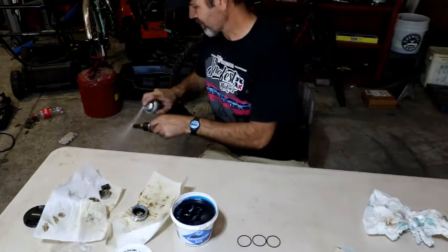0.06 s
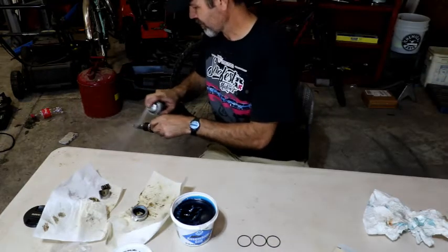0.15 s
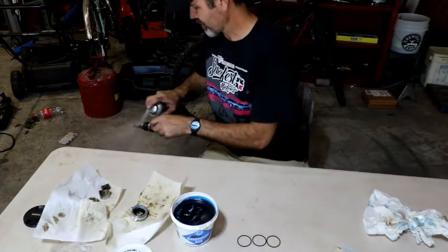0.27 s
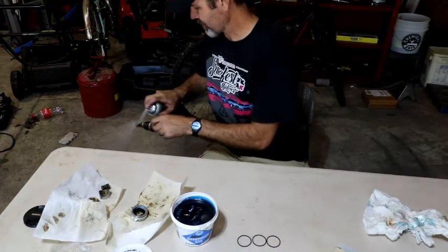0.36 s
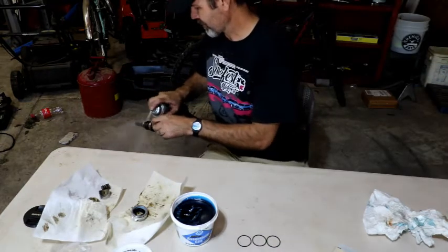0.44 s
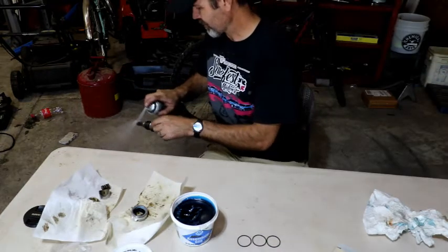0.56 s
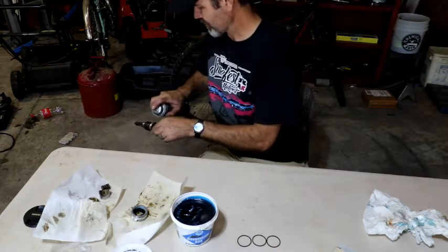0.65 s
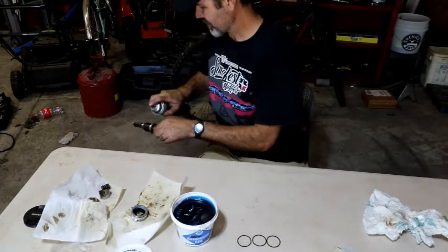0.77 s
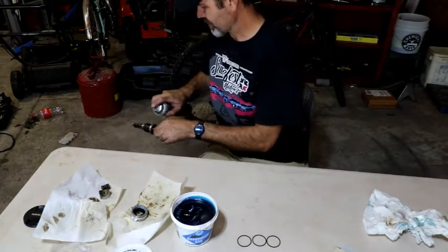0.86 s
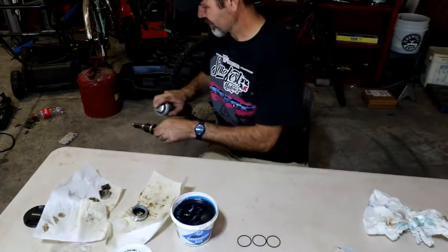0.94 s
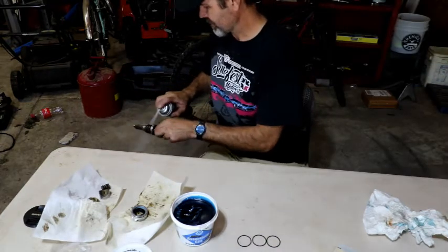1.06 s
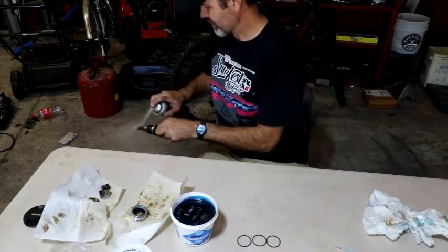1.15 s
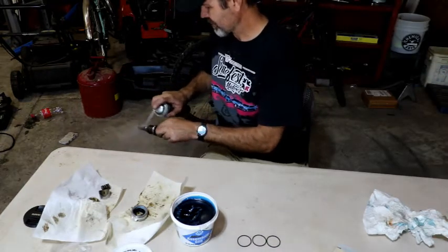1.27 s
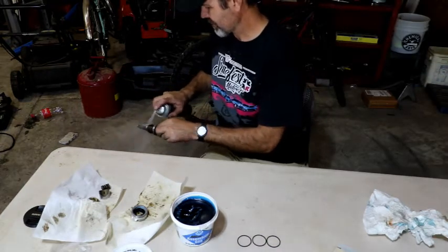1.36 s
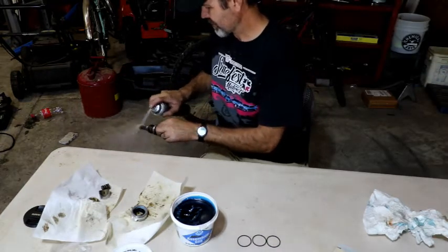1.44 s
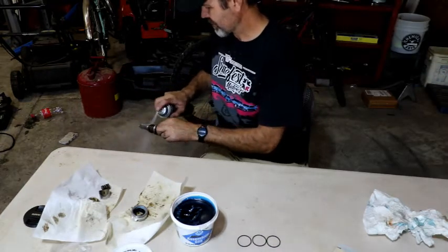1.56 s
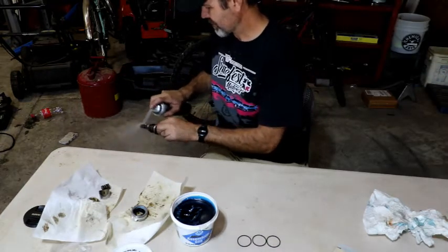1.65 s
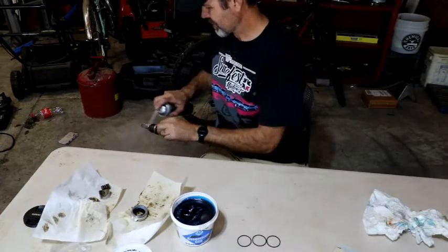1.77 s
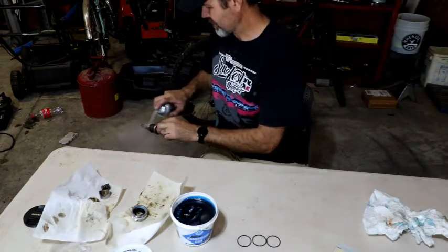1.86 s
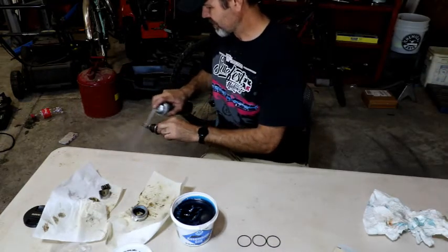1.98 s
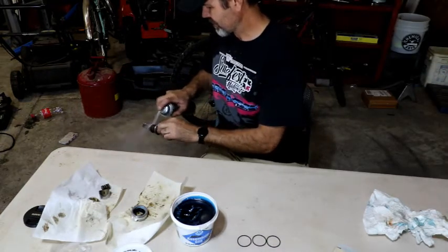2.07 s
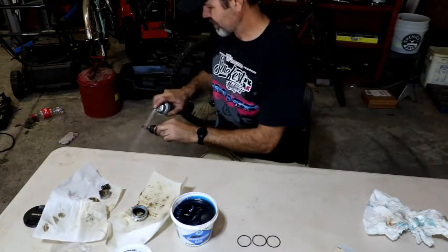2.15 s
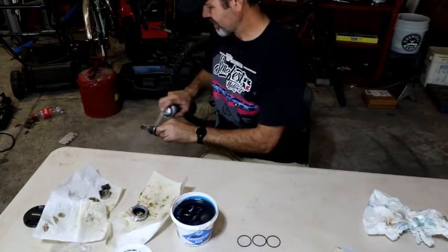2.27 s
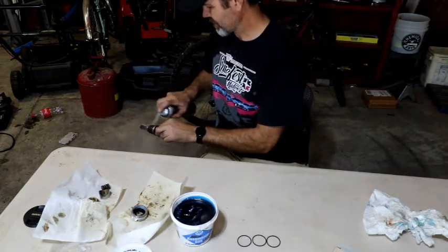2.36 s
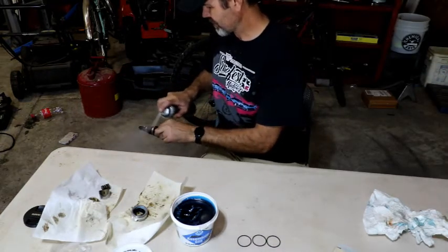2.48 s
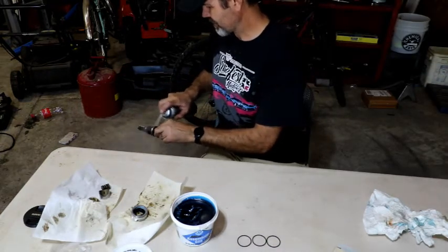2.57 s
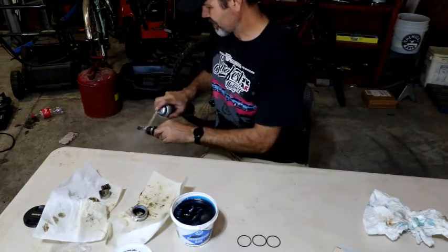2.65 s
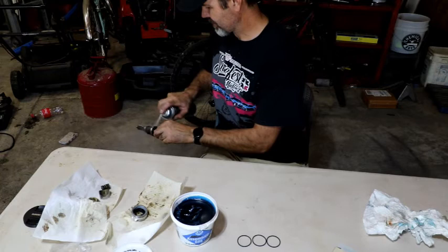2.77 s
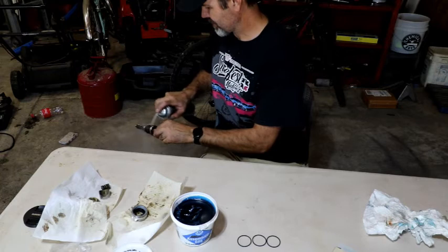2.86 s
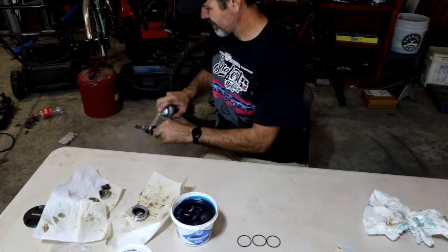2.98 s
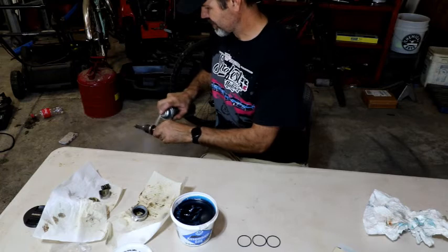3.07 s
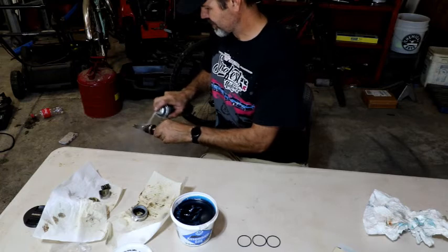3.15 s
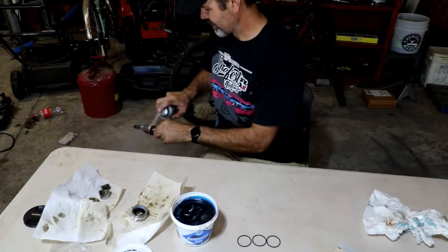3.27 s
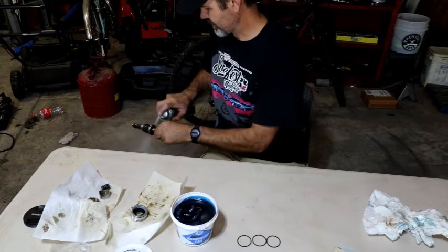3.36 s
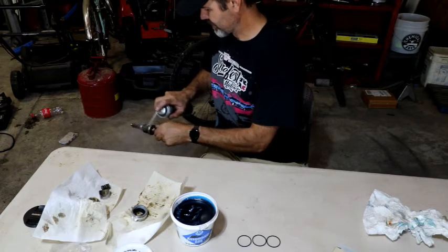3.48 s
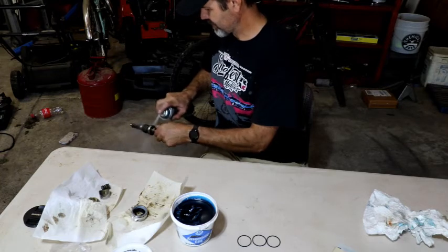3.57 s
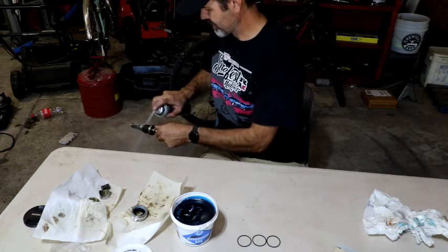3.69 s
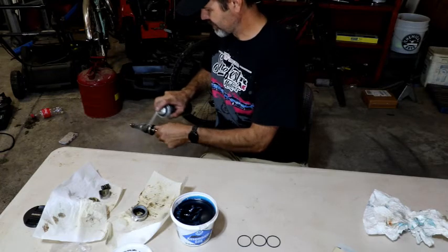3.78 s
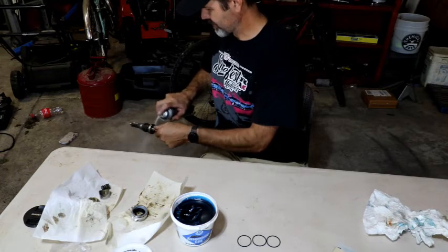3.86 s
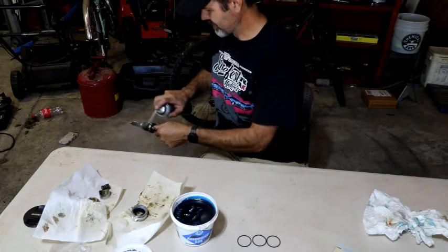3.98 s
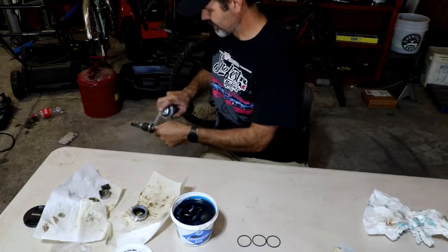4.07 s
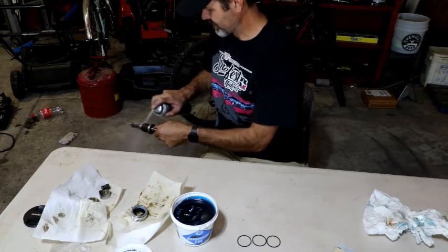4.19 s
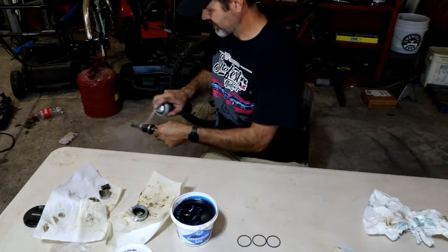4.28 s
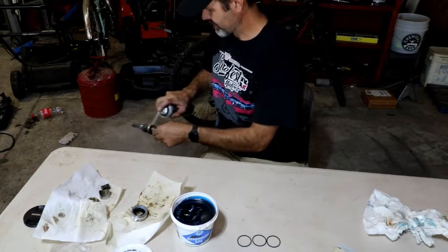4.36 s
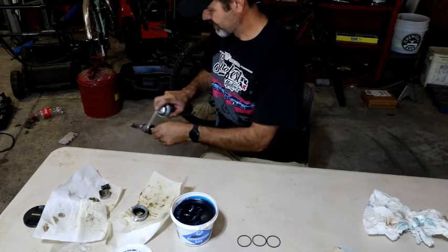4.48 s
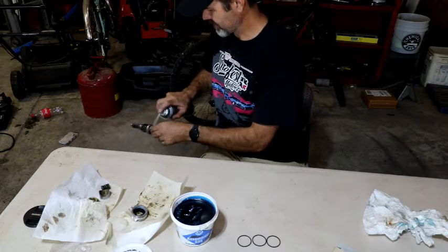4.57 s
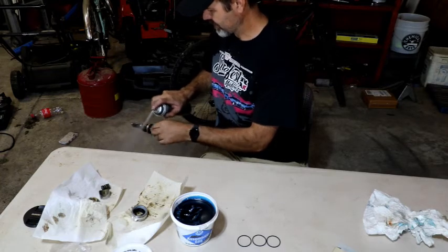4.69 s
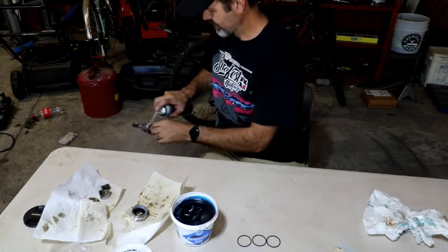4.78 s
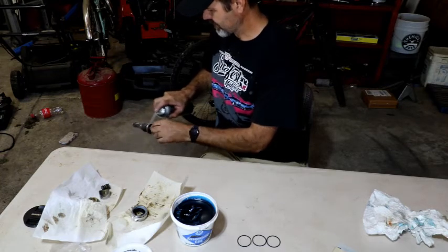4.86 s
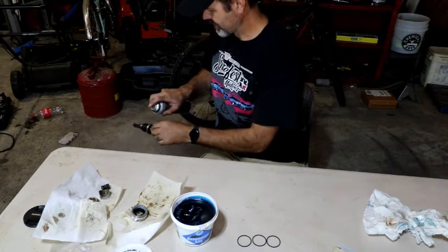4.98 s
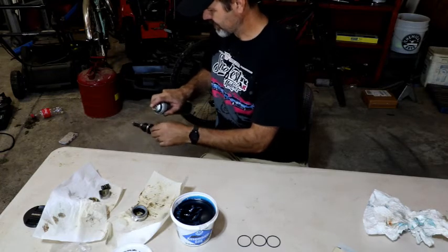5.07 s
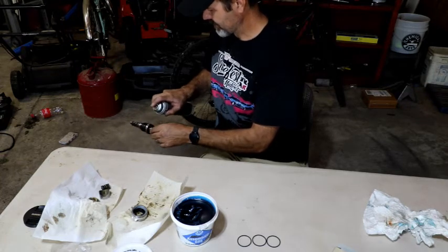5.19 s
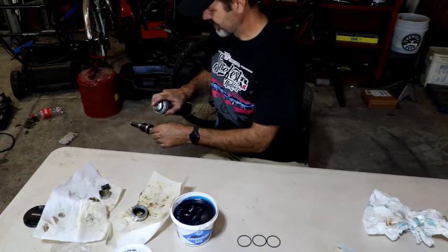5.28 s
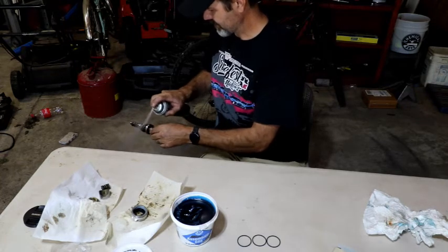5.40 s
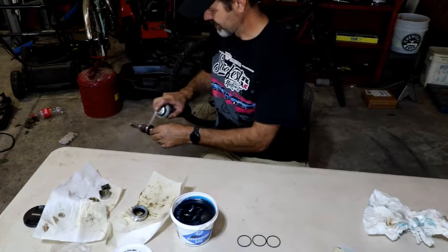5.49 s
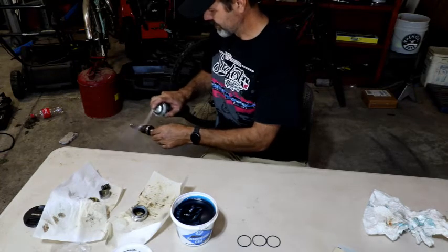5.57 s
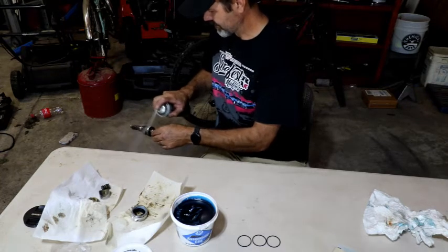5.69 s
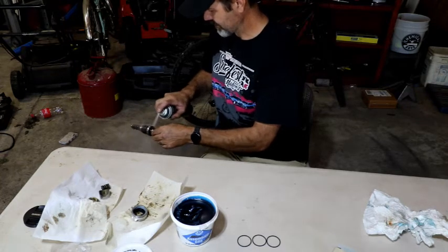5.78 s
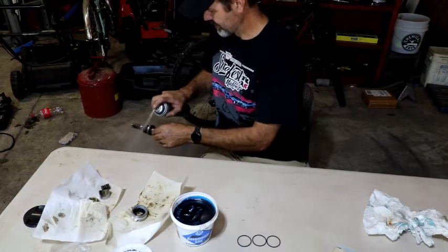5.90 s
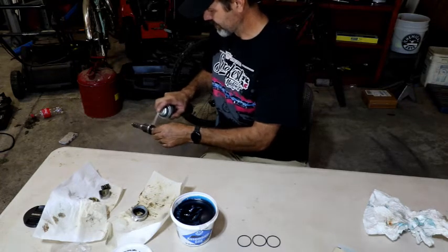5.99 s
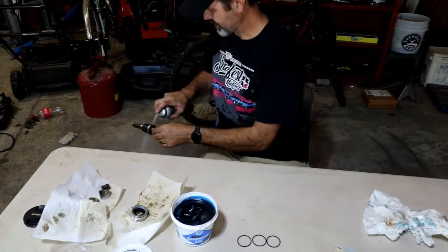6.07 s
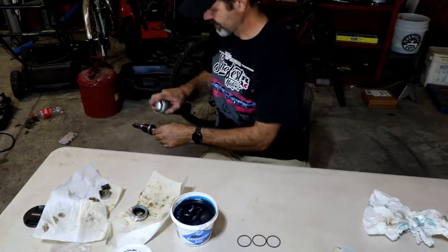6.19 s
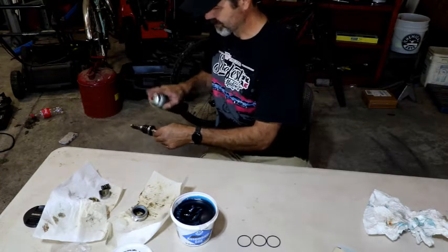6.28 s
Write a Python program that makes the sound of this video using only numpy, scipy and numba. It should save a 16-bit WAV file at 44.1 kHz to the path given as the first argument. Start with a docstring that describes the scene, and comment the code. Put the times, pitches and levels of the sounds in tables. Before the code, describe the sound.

Three bursts of pressurised spray strike metal in a garage, heard fairly close and centred. The hiss is dense and bright with a rough lower rush that thins as the jet moves towards the tip. Valve spits mark the abrupt starts and stops. Quiet gaps reveal low room rumble, slight fizz and a distant engine climbing in pitch, then dropping as it changes gear near the end.

```python
"""An aerosol can sprays cleaner through its straw onto a small metal part in a garage, in three bursts.
The jet is shaped noise and droplet impacts; the valve shapes each burst and spits as it opens and shuts.
As the aim drifts from the body of the part to its tip, the rush fades and the gap and edge tones rise in pitch;
now and then the jet catches a hollow or an edge. Nozzle ticks and fizz in the straw are noise too.
Bench, floor and walls answer; far away an engine of two sines gathers speed and changes gear."""
import sys
import numpy as np
from scipy import signal
from scipy.fft import rfft, irfft
from scipy.io import wavfile
from scipy.ndimage import uniform_filter1d
from numba import njit

SR = 44100
rng = np.random.default_rng(int(sys.argv[2]) if len(sys.argv) > 2 else 0)


def output_pcm(signal):
    """Save a mono or channel-first signal as 16-bit PCM at the path in sys.argv[1].

    Samples are clipped to [-1, 1] before scaling.
    """
    pcm = np.clip(np.atleast_2d(signal).T, -1, 1) * 32767
    wavfile.write(sys.argv[1], SR, np.round(pcm).astype(np.int16))


N = 279546
T = np.arange(N) / SR

# Levels of the can are relative, ahead of the valve and the room.
# Presses of the valve. Each row: starts to open in seconds, fully shut in seconds.
PRESSES = [(-.1, .707), (1.081, 5.049), (5.438, 6.159)]
# Where the jet points. Each row: time in seconds, aim from 0 (square on the body) to 1 (grazing the tip).
AIM = [(0, 0.006), (.66, 0.15), (1.14, .15), (1.55, 0.11), (2.15, 0.26), (2.6, 0.86), (3.3, 0.93),
       (4.0, 0.87), (4.65, 0.54), (5.0, 0.74), (5.5, 0.76), (5.75, 0.81), (6.15, 1)]
# Spectrum of the free jet. Each row: frequency in Hz, relative density in dB per Hz.
HISS_SPECTRUM = [(300, -24), (1000, -13.5), (2300, -3), (3400, -0.75), (4300, -2.5), (5000, -0.5),
                 (5500, -0.1), (6200, -6), (7500, -1.6), (8700, -1.2), (9800, -1.5), (10700, -4.5),
                 (13000, -3.2), (14600, -10.5), (16000, -14)]
# Spectrum of the jet breaking on the metal. Each row: frequency in Hz, relative density in dB per Hz.
RUSH_SPECTRUM = [(60, -29), (170, -14), (310, -9.5), (420, -1), (560, .5), (800, -3), (1100, -0.5),
                 (1700, -2.5), (3000, -19.5), (8000, -49)]
# The bore of the part as the jet turns into it. Each row: time in seconds, resonance in Hz, level in dB.
BORE = [(0, 1420, -35.5), (.6, 1400, -31.5), (1.14, 1470, -36.5), (2.15, 1540, -33.3), (3.1, 1490, -34),
        (3.9, 1440, -35.5), (4.65, 1350, -33), (5.5, 1330, -33.5), (6.15, 1330, -34.5)]
# The jet meets the edge squarely. Each row: time of the peak in seconds, rise in dB.
FLARES = [(.03, 6.5), (3.92, 9), (4.62, 8), (4.87, 7.5)]
# The jet catches a hollow of the part or the hand. Each row: time of the peak in seconds,
# time from the peak down to 1/e^2 in seconds, resonance in Hz, width of each filter pass in Hz, level in dB.
PUFFS = [(2.13, 0.054, 1680, 280, -29.5), (2.74, 0.14, 4730, 650, -29), (2.982, 0.097, 1480, 357, -28.3),
         (3.242, 0.042, 1506, 200, -26), (3.774, .048, 1370, 240, -26), (3.926, .037, 247, 100, -36),
         (4.137, 0.062, 1540, 350, -27), (4.15, .04, 2480, 250, -31), (4.296, 0.079, 1360, 230, -27.5),
         (4.615, 0.071, 1320, 310, -23), (4.874, 0.067, 1370, 298, -29.5), (5.638, .044, 1320, 350, -27.5),
         (5.737, 0.038, 486, 200, -28), (5.984, .035, 460, 220, -30.5)]
# Spectrum of the half-open valve. Each row: frequency in Hz, relative density in dB per Hz.
SPIT_SPECTRUM = [(1000, -29), (4500, -7), (6500, -12.5), (8700, -0.5), (13000, 0), (16000, -14)]
# Spectrum of the droplets boiling off in the straw. Each row: frequency in Hz, relative density in dB per Hz.
FIZZ_SPECTRUM = [(1500, -20), (4000, -10), (8500, 3), (15000, -3)]
# The finger settles on the nozzle. Each row: start in seconds, relative level in dB.
TICKS = [(5.312, -43.5), (5.322, -44)]
# Spectrum of the nozzle's plastic. Each row: frequency in Hz, relative density in dB per Hz.
TICK_SPECTRUM = [(3000, -26), (4400, -14), (5800, 0), (6800, 2), (7600, -12), (8500, -5), (11000, -13),
                 (13300, -10), (16000, -20)]
# Near reflections from bench, floor and body. Each row: mean delay in seconds, gain.
ECHOES = [(.0011, 0.24), (.0029, 0.13), (.0063, 0.11)]
# Decay of the garage. Each row: frequency in Hz, time to fall by 60 dB in seconds.
WALLS = [(150, 0.53), (800, 0.4), (2500, 0.36), (7000, 0.37), (12000, 0.22), (16000, 0.28)]
# The far engine pulls, then changes up. Each row: time in seconds, cycle rate in Hz, level in dB.
ENGINE = [(0, 27, -67), (2.1, 29.4, -60), (4.1, 31.4, -62.5), (4.7, 34, -54), (5.3, 35.3, -53.5),
          (5.68, 35.7, -54), (5.98, 26.9, -57), (6.34, 27, -59)]
# Spectrum of the steady garage background. Each row: frequency in Hz, relative density in dB per Hz.
GARAGE_SPECTRUM = [(20, -20), (52, -6), (90, 0.5), (150, -3.5), (300, -4), (500, -12), (900, -11),
                   (2000, -20), (5000, -23), (10000, -25.5), (15500, -26)]


def spray():
    """Gas and droplets leave the straw, break on the part and excite its cavities while the valve is open."""
    aim, = curves(AIM)
    opening = valve(open_s=0.016, shut_s=0.0117)
    # the liquid boils unevenly in the straw, so the whole jet flutters
    flow = opening ** 1.3 * undb(0.73 * walk(69))
    jet = free_jet() + rush(aim) + bore() + gap(aim) + edge(aim) + puffs()
    return flow * jet + spit(opening)


def valve(open_s, shut_s):
    """The valve opens and shuts in straight ramps, 0-1."""
    opening = np.zeros(N)
    for on, off in PRESSES:
        ramps = np.minimum((T - on) / open_s, (off - T) / shut_s)
        opening += np.clip(ramps, 0, 1)
    return opening


def free_jet():
    """Turbulent gas hisses and carries fine droplets, at the same level in every burst."""
    gas = colour(noise(), HISS_SPECTRUM)
    drops = colour(droplets(per_s=3000, scatter_db=2.5), HISS_SPECTRUM)
    return undb(-22) * (gas + undb(-8.5) * drops)


def rush(aim):
    """The jet breaks on the metal, most strongly when square on the body."""
    level_db = between((-30, -34.5), aim) + 1.67 * walk(21.4)
    return undb(level_db) * colour(noise(), RUSH_SPECTRUM)


def bore():
    """Turbulence rings the bore, whose resonance moves as the jet turns into it."""
    hz, db = curves(BORE)
    level_db = db + 2.0 * walk(34)
    return undb(level_db) * cavity(hz * (1 + 0.021 * walk(11.5)), width_hz=670)


def gap(aim):
    """The narrow gap between straw and part resonates higher and weaker towards the tip."""
    level_db = between((-28.5, -32), aim) + 1.3 * walk(12)
    hz = between((4250, 4580), aim) * (1 + 0.012 * walk(11))
    return undb(level_db) * cavity(hz, width_hz=950)


def edge(aim):
    """The jet splits on an edge into a broad tone, which flares where it meets the edge squarely."""
    flare_db = sum(db * swell(s, length=0.07) for s, db in FLARES)
    level_db = between((-31.5, -35), aim) + flare_db + 1.8 * walk(16)
    hz = between((8400, 8770), aim) * (1 + 0.0058 * walk(25))
    return undb(level_db) * cavity(hz, width_hz=2000)


def puffs():
    """Hollows of the part or the hand resonate briefly as the jet catches them."""
    return sum(undb(db) * swell(s, length) * cavity(hz, width) for s, length, hz, width, db in PUFFS)


def spit(opening):
    """A half-open valve throttles the gas into a short bright spit, softer as it shuts."""
    throttle = opening ** 2 * np.sqrt(np.clip(1 - opening ** 2, 0, 1))
    level_db = np.where(np.gradient(opening) > 0, -4.2, -8.5)
    return undb(level_db) * throttle * colour(noise(), SPIT_SPECTRUM)


def fizz():
    """Propellant left in the straw boils off; the longer the burst, the wetter the straw."""
    soak_s = 2.5  # time constant of soaking and drying
    spraying = sum((T > on) * (T < off) for on, off in PRESSES)
    keep = np.exp(-1 / (soak_s * SR))
    wetness = signal.lfilter([1 - keep], [1, -keep], spraying)
    boiling = colour(droplets(per_s=6000, scatter_db=7), FIZZ_SPECTRUM)
    return undb(-56.5) * wetness * boiling


def ticks():
    """The plastic nozzle clicks in its seat and scuffs on briefly."""
    touch = np.zeros(N)
    for s, db in TICKS:
        since = np.abs(T - s)
        scuff, click = np.exp(-since / .016), np.exp(-since / .0015)
        touch += undb(db) * (T >= s) * (scuff + click)
    return 0.8 * touch * colour(noise(), TICK_SPECTRUM)


def droplets(per_s, scatter_db):
    """Tiny impacts of uneven size at random moments."""
    hits = rng.random(N) < per_s / SR
    return hits * noise() * undb(scatter_db * noise())


def cavity(hz, width_hz):
    """Turbulence passes a resonance twice, for steep skirts, at rms 1."""
    hz = hz * np.ones(N)
    once = svf(noise(), hz, float(width_hz))
    return unit(svf(once, hz, float(width_hz)))


@njit
def svf(x, hz, width):
    """State-variable band-pass whose centre moves."""
    y, band, low = np.empty(len(x)), 0., 0.
    for i in range(len(x)):
        g = np.tan(np.pi * hz[i] / SR)
        damping = width / hz[i]
        v = (band + g * (x[i] - low)) / (1 + g * (g + damping))
        band = 2 * v - band
        low += 2 * g * v
        y[i] = damping * v
    return y


def room(x, wet_db, sway_s):
    """The hands sway and the splash moves, so near echoes slide and the wall pattern keeps changing."""
    near = waver(x, depth_db=3.0, patch_hz=350, patch_s=.06)
    for delay, gain in ECHOES:
        near += gain * np.interp(T - delay - sway_s * walk(2.3), T, x)
    # four wall responses trade shares of the sound at constant total power
    shares = np.array([walk(rate=16.0) for _ in range(4)])
    shares /= np.linalg.norm(shares, axis=0)
    far = sum(signal.fftconvolve(share * x, reverb())[:N] for share in shares)
    return undb(-2.5) * (near + undb(wet_db) * far)


def waver(x, depth_db, patch_hz, patch_s):
    """The splash beams its hiss in shifting lobes, so patches of the spectrum swell and fade."""
    f, t, z = signal.stft(x, SR, nperseg=512)
    size = (max(int(patch_hz / f[1]), 1), max(int(patch_s / t[1]), 1))
    field = rng.standard_normal(z.shape)
    for axis in (0, 1, 0, 1):
        field = uniform_filter1d(field, size[axis], axis=axis, mode="wrap")
    # short waves are beamed most
    db = depth_db * unit(field) * np.sqrt(f / f[-1])[:, None]
    return signal.istft(z * undb(db), SR)[1][:N]


def reverb():
    """A diffuse wall response, its decay time set by frequency and its energy evened over the spectrum."""
    f, t, z = signal.stft(rng.standard_normal(SR // 2), SR, nperseg=256)
    decay_db = -60 * t / at_hz(f, WALLS)[:, None]
    tail = signal.istft(z * undb(decay_db), SR)[1]
    # the walls answer from 3 ms on, fading in over 3.8 ms
    tail *= np.clip((T[:len(tail)] - .003) / 0.0038, 0, 1)
    # many paths share the energy evenly over neighbouring frequencies
    response = rfft(tail)
    power = uniform_filter1d(np.abs(response) ** 2, size=60)
    return irfft(response / np.sqrt(power))[:SR // 3]


def engine():
    """Only the lowest firing orders, 2 and 3 per cycle, come through the wall, throbbing unevenly."""
    hz, db = curves(ENGINE)
    phase = 2 * np.pi * np.cumsum(hz * (1 + .006 * walk(12))) / SR
    second = undb(2 * walk(10)) * np.sin(2 * phase)
    third = undb(-1 + 1.4 * walk(10)) * np.sin(3 * phase)
    return undb(db) * unit(second + third)


def garage():
    """The steady background of the place is noise, strongest in the bass."""
    return undb(-51.5) * colour(noise(), GARAGE_SPECTRUM)


def noise():
    """White noise."""
    return rng.standard_normal(N)


def walk(rate):
    """Smooth chance with about `rate` turns a second, rms 1."""
    k = max(int(SR / rate), 1)
    smooth = uniform_filter1d(noise(), k)
    return unit(uniform_filter1d(smooth, k))


def colour(x, points):
    """Weight the spectrum of x by (Hz, dB) points, at rms 1."""
    gain = undb(at_hz(np.fft.rfftfreq(N, 1 / SR), points))
    return unit(irfft(rfft(x) * gain, N))


def at_hz(hz, points):
    """Read (Hz, value) points on a log-frequency axis."""
    f, value = np.transpose(points)
    return np.interp(np.log(np.maximum(hz, 1)), np.log(f), value)


def curves(rows):
    """The columns of a time table, one value a sample."""
    s, *columns = np.transpose(rows)
    return [np.interp(T, s, c) for c in columns]


def swell(s, length):
    """A smooth rise and fall around time s, top 1, down to 1/e^2 at `length` seconds either side."""
    return np.exp(-2 * ((T - s) / length) ** 2)


def between(ends, share):
    """Slide from the first value to the second as share goes from 0 to 1."""
    return ends[0] + (ends[1] - ends[0]) * share


def undb(db):
    """Decibels to gain."""
    return 10 ** (np.asarray(db) / 20)


def unit(x):
    """Scale to rms 1."""
    return x / np.sqrt(np.mean(x ** 2))


def scene():
    """Can in the garage, far engine and steady background, the same in both channels."""
    can = room(spray() + fizz() + ticks(), wet_db=-3.5, sway_s=.00008)
    mono = can + engine() + garage()
    return np.array([mono, mono])


def record(dry):
    """The recorder behind the microphone cuts the top steeply above 15.8 kHz."""
    top_cut = signal.ellip(12, .1, 80, 15800, fs=SR, output="sos")
    return signal.sosfilt(top_cut, dry)


dry = scene()
out = record(dry)
output_pcm(out)
```